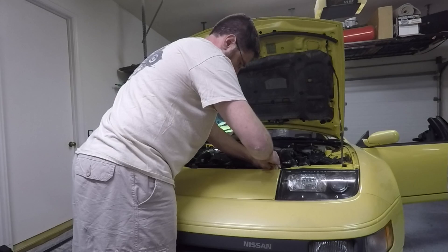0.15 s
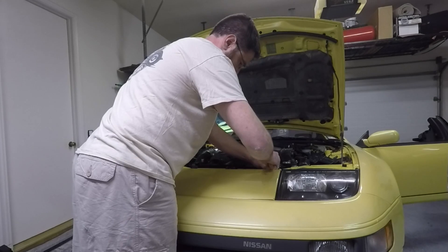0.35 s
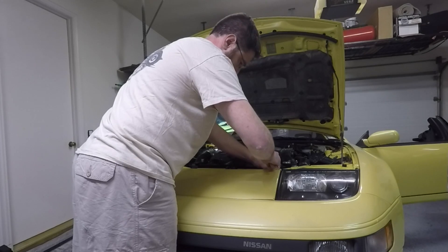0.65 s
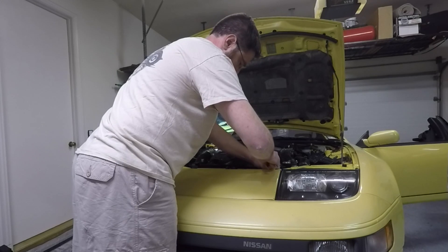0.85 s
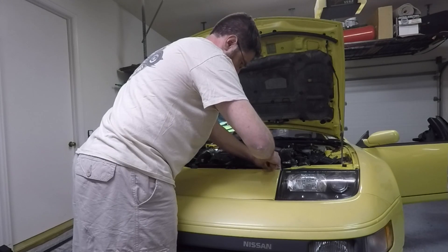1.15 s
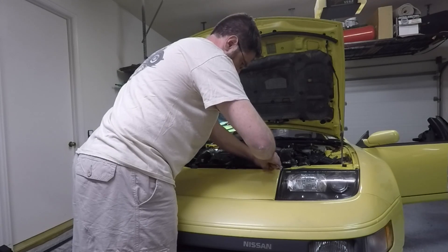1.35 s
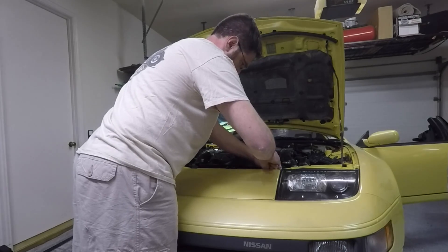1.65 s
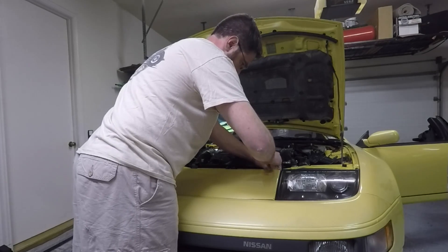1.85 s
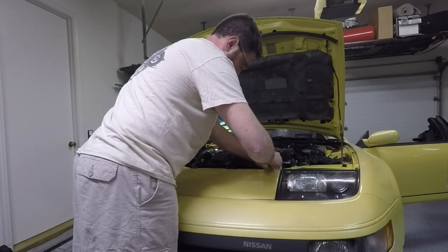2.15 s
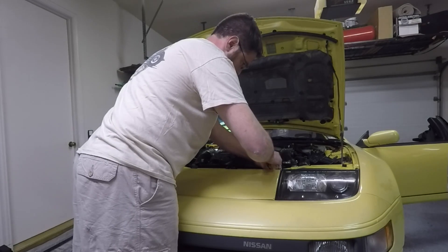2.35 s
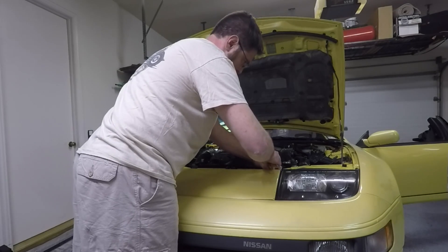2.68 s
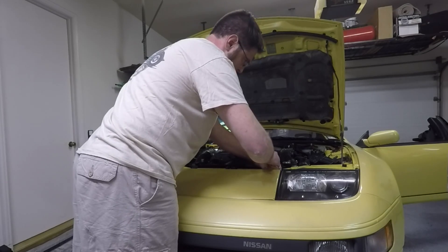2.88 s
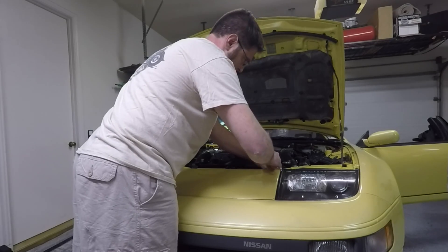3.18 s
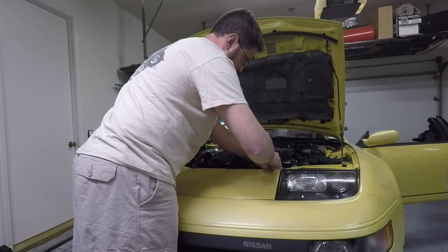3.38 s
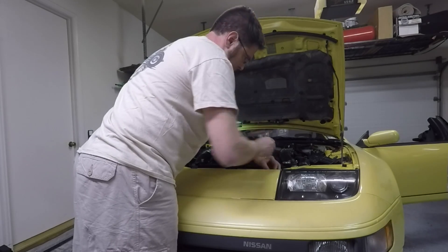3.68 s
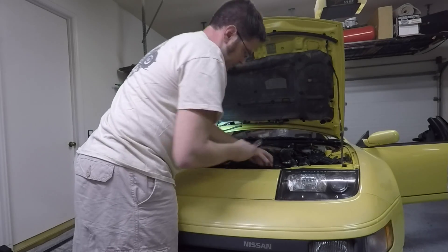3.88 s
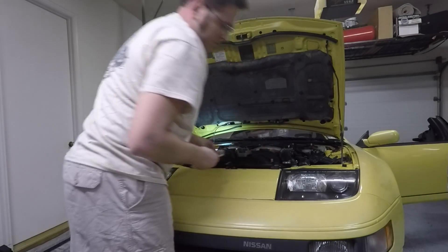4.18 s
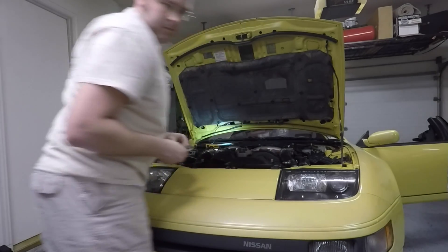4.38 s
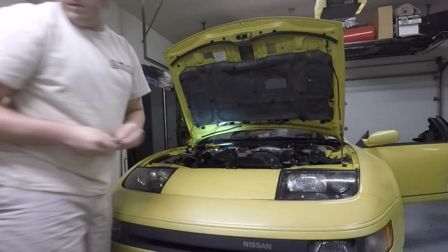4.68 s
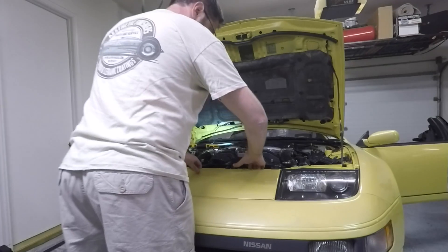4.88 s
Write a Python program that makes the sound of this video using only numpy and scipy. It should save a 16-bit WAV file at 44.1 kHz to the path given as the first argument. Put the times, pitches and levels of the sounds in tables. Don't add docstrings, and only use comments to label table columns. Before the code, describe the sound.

In a hushed concrete garage, someone touches steel car parts with small tools. Sparse dull taps and a little clip snap give way after three seconds to clanks, rapid clicks and a hard skidding slip. Movement rustle swells, loose parts tick, then thin bright scrapes end it after a brief level dip. Stereo, a couple of metres away, with faint room noise.

```python
import sys
import numpy as np
from scipy import signal
from scipy.fft import rfft, irfft
from scipy.io import wavfile
from scipy.ndimage import uniform_filter1d

SR = 44100
rng = np.random.default_rng(int(sys.argv[2]) if len(sys.argv) > 2 else 0)


def to_wav(sig):
    pcm = np.clip(np.atleast_2d(sig), -1, 1) * 32767
    pcm = np.round(pcm).astype(np.int16)
    wavfile.write(sys.argv[1], SR, pcm.T)


def invert_db(level):
    return 10 ** (np.asarray(level, dtype=float) / 20)


N = 221812
SIZE = 8192

# start_s, level_db (peak at 1.3-3 kHz),
# thud_db (panel, relative), ring_db (bright, relative: hard steel on steel rings higher)
SOCKET_KNOCKS = [(0.0766, -78, -6, -2), (0.191, -56, 2.5, -7), (0.284, -45, 8.5, 2), (0.406, -67, 1, -14),
                 (0.615, -71, -1, -12), (0.6985, -71, 3.5, -25), (0.9842, -55, -8.5, -4),
                 (1.525, -84, -4, -3), (2.0925, -57.5, 4, -17), (2.1096, -55, 4, -20),
                 (2.1789, -58.5, -5, -24), (2.442, -62.5, 8, -2), (2.567, -56.5, 4, -4),
                 (2.6917, -70.5, 12, -19), (2.827, -71, 1, -8), (2.942, -75.5, 16.5, -20),
                 (2.998, -51.5, 2.5, -19), (4.3934, -59, -17, -17), (4.4205, -58, -2, -11)]
CLIP_SNAPS = [
    (1.5775, -51.5, 7.2, 7.5),
    (1.6294, -62, 5.4, -16),
    (1.6681, -55.5, 1.7, -22),
    (1.7584, -63, 9.2, -22),
    (1.8049, -62.5, 10.4, -15),
    (1.9154, -76, 5.9, 1),
]
WRENCH_CLANKS = [
    (3.0254, -38.5, -25, -17),
    (3.0345, -36.5, -8, -33),
    (3.0449, -33, -46, -25.5),
    (3.0564, -45, 6.5, -30),
    (3.1804, -56, 5.5, -27),
]
RATCHET_CLICKS = [(3.5602, -32, -29, -9), (3.5692, -31.5, -21, -20), (3.5702, -27.5, -18, -21),
                  (3.588, -54, -29, -25), (3.6042, -51, -33, -20), (3.6142, -30.5, -24, -18),
                  (3.6244, -31.5, -32, -25), (3.6412, -40, -21, -23), (3.6594, -42, -26, -23),
                  (3.697, -41, -32, -5.5)]
NUT_TICKS = [(0.1735, -57, 4, -5), (2.5044, -61.5, 3.5, -17), (2.5194, -61.5, 10, 0), (3.2364, -54.5, 7, 0),
             (3.258, -38.5, -2, -2), (3.2844, -44, -26, -27), (4.3063, -44, -2.5, -19),
             (4.3264, -47, -2.5, -3), (4.3413, -41.5, -2, -2), (4.3574, -65, 7, -18)]
BOLT_SLIPS = [(3.7654, -54.5, -12, 10), (3.7874, -38.5, -18, 5), (3.7927, -40, -27, 10),
              (3.8062, -33.5, -6, 5), (3.8224, -23.5, -12, 2), (3.8262, -23, -9, -18),
              (3.8944, -37, -11, -0.5), (4.0194, -40.5, -6, -33), (4.0367, -40, -15, -33),
              (4.0794, -59, -2, -1)]
BRACKET_SCRAPES = [(4.2182, -42, -20, -22), (4.811, -50, -41, 11.5), (4.8197, -46.5, -20, 6),
                   (4.8274, -49, -18, 6.5), (4.8454, -53, -26, 10), (4.8726, -58.5, -14, 13),
                   (4.8818, -52, -16, -13), (4.9063, -54, -0.5, 8), (4.9338, -50, -5, -3)]

# (pitch_hz, level_db)
SOCKET = ([(583, 58, 4), (2140, 102, -9.5), (3620, 39, -12), (4350, 61, -19.5), (4800, 69, -39)],
           [(180, -37), (300, -15.5), (620, 2), (857, -1.5), (955, -9.5), (1470, -11.5), (1800, -39),
           (2200, -5), (3040, -51), (4400, -18), (6080, -29.5), (7210, -16), (8810, -48), (12000, -76),
           (15600, -77), (22000, -120)])
CLIP = ([(535, 117, 7), (1050, 28, -3), (2210, 67, -5), (3710, 110, -8)], [(180, -45), (300, -2.5),
         (583, -1), (769, -2), (1060, 6.5), (1800, -14), (2230, -2), (2520, -22), (3090, -30), (5060, -6.5),
         (5990, -14.5), (6570, -60), (7670, -27), (12000, -46), (15600, -76.5), (22000, -120)])
WRENCH = ([(1460, 37, -15), (2160, 19, 7), (2070, 86, 1), (2610, 65, -5.5), (2930, 23, -38)], [(180, -50),
           (300, -18), (437, -10), (869, -13.5), (1310, -11.5), (1440, 5.5), (1700, -13.5), (2320, -3.5),
           (2920, -43), (3610, -16), (6620, -36), (11500, -44), (15000, -78)])
PAWL = ([(1450, 48, -9), (2023, 28, 0), (2310, 44, 2.5), (2560, 120, -3), (5000, 43, 2)], [(180, -60),
         (300, -29), (334, -31), (539, -19), (940, -17.5), (1320, -17), (1430, -1), (1690, -18.5),
         (2600, -4), (3230, -15.5), (4980, -9.5), (12000, -30), (15600, -82), (22000, -120)])
NUT = ([(570, 21, -5.5), (1520, 32, 0.5), (2190, 140, -9), (4430, 97, -7.5)], [(180, -51), (300, -8),
        (430, -6.5), (928, -11.5), (1330, -7), (1470, -13), (1820, -17.5), (2170, -2.5), (2440, -15),
        (3220, -26), (5800, -17), (11000, -32.5), (12500, -38), (15000, -39)])
BOLT = ([(2165, 38, -8.5), (3350, 51, -10.5), (4950, 140, -13), (6670, 95, -14), (7060, 96, -12)],
         [(180, -58), (300, -31), (597, -16), (1310, -18.5), (1420, -17), (2040, -9.5), (2210, -4),
         (2600, -14), (3270, -16), (4540, -12), (4930, -13), (5620, -10.5), (7670, -10), (15000, -32.5)])
BRACKET = ([(1836, 62, 1), (5000, 50, -9), (6540, 43, -7), (7300, 59, 2), (9620, 120, -13)], [(180, -51),
            (300, -1), (1040, -17), (1620, -4.5), (1820, -3), (3610, -10.5), (4540, -2), (6840, -2),
            (7540, 7.5), (8600, -10), (9490, 4), (12700, -21), (15000, -14)])
CONTACT_EDGES_HZ = (300, 1300, 3000, 6000, 15000)

# start_s, level_db, pitch_hz, length_s
BODY_THUDS = [(3.056, -51.5, 437, 0.027), (3.299, -43.5, 515, 0.01), (3.31, -57, 229, 0.012),
              (3.824, -38.5, 487, 0.0069), (4.486, -55.5, 226, 0.022), (4.985, -42.5, 410, 0.034)]
# start_s, level_db, pitch_hz, length_s
SHORT_NOTES = [(.178, -56, 8200, 0.0043), (.284, -55, 4350, 0.013), (.984, -56.5, 3970, 0.0052),
               (2.503, -56.5, 5570, 0.0055), (2.505, -55, 6970, 0.0095), (2.505, -57, 8440, 0.0086),
               (3.028, -49, 6740, 0.011), (3.239, -46, 4100, 0.012), (3.242, -49.5, 8700, 0.015),
               (3.258, -38.5, 5950, 0.0023), (3.258, -45, 12640, .02), (3.29, -50.5, 4030, 0.035),
               (3.895, -36.5, 5350, 0.057), (3.90, -41.5, 3230, 0.041), (4.05, -45.5, 4220, .015),
               (3.70, -55, 5000, 0.0087), (4.08, -47, 4700, 0.018), (4.03, -42.5, 3250, 0.036),
               (4.152, -42, 1860, 0.014), (4.166, -40.5, 1880, 0.012), (4.305, -44.5, 4700, 0.028),
               (4.306, -49, 10400, 0.0044), (4.34, -50, 7450, .006), (4.357, -59, 7500, 0.0055),
               (4.357, -60, 11400, 0.0037), (4.36, -45.5, 2300, 0.005), (4.93, -56, 2210, 0.031)]
# time_s, left_minus_right_db
HAND_PAN = [(0.0, 1.8), (0.73, -1.5), (1.0, 2.2), (2.8, 0.6), (2.9, 2), (3.95, 0.9), (4.16, 8), (4.54, -.6),
            (4.75, 7), (5.03, 0.5)]

# time_s, effort_db, tilt_db (per range; rubbing on steel is bright, on cloth dull)
MOVEMENT = [(0.0, -75.5, -0.8), (0.35, -69, -2), (0.67, -79, -1.5), (1.2, -78.5, -1.1), (1.75, -73.5, -3),
            (1.899, -76.5, -1.1), (2.13, -74, -4.5), (2.35, -72, -3), (2.59, -72, -3), (3.15, -67, -2),
            (3.55, -65, -0.7), (3.72, -61, -1.1), (4.06, -57, 0.3), (4.25, -56, 2.9), (4.5, -58.5, -0.6),
            (4.62, -65.5, 3), (4.87, -70.5, 1), (5.03, -63.5, 1.7)]
RUSTLE_EDGES_HZ = (100, 400, 1300, 4000, 11500)
CLOTH_DB = (-3.5, 1.5, 1.5, -4.5)
SLIDE_DB = (-73, -55, -45.5, -47.5)
# peak_s, level_db
FOOTFALLS = [(0.3, -97), (1.4, -81.5), (3.05, -78), (3.84, -66.5), (4.45, -62), (4.68, -61.5), (4.93, -72)]

# pitch_hz, level_db
HUSH_SPECTRUM = [(15, -42), (25, -19.5), (135, 5), (286, -2.5), (438, 2), (952, -11.5), (1030, -12),
                 (1420, -3), (1720, -16), (2240, -12.5), (3090, -21.5), (8780, -17.5), (12100, -28),
                 (15000, -16.5)]
# pitch_hz, correlation
NOISE_LIKENESS = [(30, 0.75), (150, 0.51), (500, 0.79), (1500, 0.71), (4000, 0.022), (12000, 0.02)]
# pitch_hz, t60_s
GARAGE_T60 = [(200, 0.61), (600, 0.37), (2000, 0.17), (5000, 0.27), (12000, 0.14)]
# pitch_hz, correlation
ECHO_LIKENESS = [(300, 0.87), (1000, 0.97), (2500, 0.43), (5000, 0.011), (12000, 0.1)]
# time_s, level_db
LEVEL_DIP = [(0, 7), (4.76, -5), (4.80, -5.5), (4.813, -12.5), (4.833, 0.5), (5.1, 0)]


def contacts(events, part, weak_db, rise_s, grit_db, tick_db, damping, length_s, sizzle_db):
    ranges = [skirts(lo, hi) for lo, hi in zip(CONTACT_EDGES_HZ, CONTACT_EDGES_HZ[1:])]
    pitch_hz, width_hz, mode_db = np.transpose(part[0])
    strong = np.abs(resonances(pitch_hz, width_hz * damping)) ** 4
    weak = invert_db(on_log(np.fft.rfftfreq(SIZE, 1 / SR), part[1]) + weak_db) ** 2
    out = np.zeros(N + SIZE)
    for start_s, level_db, thud_db, ring_db in events:
        strike_db = mode_db - 3.0 * rng.standard_normal(len(pitch_hz))
        body = causal(np.sqrt(weak + invert_db(strike_db) ** 2 @ strong))
        slow = chatter(length_s * 1.2, rise_s * 1.2, grit_db, tick_db)
        quick = chatter(length_s * 0.7, rise_s * 0.7, grit_db, tick_db)
        forces = (slow, slow, quick, quick)
        relative_db = (thud_db, 0, ring_db, ring_db + sizzle_db)
        for span, rel_db, force in zip(ranges, relative_db, forces):
            add(out, start_s, force * body * span, level_db + rel_db)
    return out[:N]


def notes(events, width_share, grit_db, tick_db):
    out = np.zeros(N + SIZE)
    for start_s, level_db, pitch_hz, length_s in events:
        force = chatter(length_s, 0.00093, grit_db, tick_db)
        mode = resonances(pitch_hz, width_share * pitch_hz)[0] ** 2
        add(out, start_s, force * mode, level_db)
    return out[:N]


def chatter(length_s, rise_s, grit_db, tick_db):
    t = np.arange(SIZE) / SR
    grit = rng.standard_normal(SIZE) * invert_db(np.minimum(grit_db * rng.exponential(size=SIZE), 15))
    force = grit * (1 - np.exp(-t / rise_s)) * np.exp(-(t / max(length_s, 0.001)) ** 1.54)
    force[8] = invert_db(tick_db) * np.sqrt(np.sum(force ** 2))
    return rfft(force)


def resonances(pitch_hz, width_hz):
    offset_hz = np.fft.rfftfreq(SIZE, 1 / SR) - np.reshape(pitch_hz, (-1, 1))
    return 1 / (1 + 2j * offset_hz / np.reshape(width_hz, (-1, 1)))


def skirts(lo_hz, hi_hz):
    b, a = signal.butter(2, [lo_hz / 1.15, hi_hz * 1.1], "bandpass", fs=SR)
    return signal.freqz(b, a, SIZE // 2 + 1, include_nyquist=True)[1]


def causal(gain):
    cepstrum = irfft(np.log(gain))
    cepstrum[1:SIZE // 2] *= 2
    cepstrum[SIZE // 2 + 1:] = 0
    return np.exp(rfft(cepstrum))


def add(out, start_s, spectrum, level_db):
    sound = irfft(spectrum)
    crest = np.sqrt(2 * uniform_filter1d(sound ** 2, size=128).max())
    out[int(start_s * SR):][:SIZE] += sound * invert_db(level_db) / crest


def garage(x):
    wet_db, side_db, onset_s = 0.1, 3, 0.004
    t = np.arange(SR // 2) / SR
    tail = 0
    for hz in 150 * 2. ** np.arange(7):
        fade = np.exp(-np.log(1000) * t / on_log(hz, GARAGE_T60)) * (1 - np.exp(-t / onset_s))
        part = band(rng.standard_normal((2, len(t))), hz / np.sqrt(2), hz * np.sqrt(2)) * fade
        like = np.clip(on_log(hz, ECHO_LIKENESS), 0, 0.99)
        part *= np.sqrt(hz / np.sum(part[0] ** 2)) * np.sqrt([[1 + like], [(1 - like) * invert_db(side_db)]])
        mid, side = part
        tail = tail + np.array([mid + side, mid - side])
    tail *= invert_db(wet_db) / np.sqrt(np.sum(tail[0] ** 2))
    tail[:, 0] = 1
    return signal.fftconvolve(x[None], tail, axes=1)[:, :N]


def rustle():
    flicker_db, grain_db, trim_db = 2.5, 2.0, -3
    time_s, effort_db, tilt_db = np.transpose(MOVEMENT)
    out = 0
    for k, (lo, hi) in enumerate(zip(RUSTLE_EDGES_HZ, RUSTLE_EDGES_HZ[1:])):
        noise = wide_noise(np.ones_like) * invert_db(grain_db * rng.exponential(size=N))
        rub_db = effort_db + CLOTH_DB[k] + tilt_db * (k - 3 / 2)
        rub = invert_db(np.interp(np.arange(N) / SR, time_s, rub_db))
        skid = swell(3.915, SLIDE_DB[k], rise_s=0.16, fall_s=0.051)
        out = out + unit(band(noise, lo, hi)) * np.hypot(rub, skid) * invert_db(flicker_db * walk(25) + trim_db)
    return out


def hush():
    hiss_db, shake_db, shake_share, foot_fade_s = -72.5, -77, 0.88, 0.12
    hiss = wide_noise(lambda hz: invert_db(on_log(hz, HUSH_SPECTRUM))) * invert_db(hiss_db + 0.5 * walk(1.7))
    rumble = unit(band(wide_noise(np.ones_like), 26, 165))
    time_s, effort_db, _ = np.transpose(MOVEMENT)
    effort = np.interp(np.arange(N) / SR, time_s, effort_db - effort_db.mean())
    shake = invert_db(shake_db + shake_share * effort)
    steps = sum(swell(start_s, level_db, foot_fade_s, foot_fade_s) for start_s, level_db in FOOTFALLS)
    return hiss + rumble * (shake + steps)


def wide_noise(gain):
    hz = np.fft.rfftfreq(N, 1 / SR)
    like = np.clip(on_log(hz, NOISE_LIKENESS), 0, 1)
    mid, side = rfft(rng.standard_normal((2, N))) * gain(hz) * np.sqrt([1 + like, 1 - like])
    return unit(irfft(np.array([mid + side, mid - side]), N))


def swell(peak_s, level_db, rise_s, fall_s):
    late_s = np.arange(N) / SR - peak_s
    return invert_db(level_db - 20 * np.maximum(-late_s / rise_s, late_s / fall_s))


def walk(rate_hz):
    k = int(SR / rate_hz)
    return uniform_filter1d(np.repeat(rng.standard_normal(N // k + 1), k), k)[:N]


def band(x, lo_hz, hi_hz):
    return signal.sosfilt(signal.butter(2, [lo_hz, hi_hz], "bandpass", fs=SR, output="sos"), x)


def unit(x):
    return x / np.sqrt(np.mean(x ** 2))


def on_log(hz, table):
    pitch_hz, value = np.array(table)[:, 0], np.array(table)[:, 1]
    return np.interp(np.log(hz + 1), np.log(pitch_hz), value)


def scene():
    tools = contacts(SOCKET_KNOCKS, SOCKET, weak_db=2.0, rise_s=0.0028, grit_db=5.0, tick_db=-6.5,
                     damping=3.5, length_s=0.015, sizzle_db=-8.5)
    tools += contacts(CLIP_SNAPS, CLIP, weak_db=0.5, rise_s=0.0015, grit_db=1.5, tick_db=-13.0,
                      damping=2.8, length_s=0.015, sizzle_db=-23)
    tools += contacts(WRENCH_CLANKS, WRENCH, weak_db=4.5, rise_s=0.0014, grit_db=10.5, tick_db=-5.5,
                      damping=2.4, length_s=0.017, sizzle_db=13)
    tools += contacts(RATCHET_CLICKS, PAWL, weak_db=1.5, rise_s=0.0007, grit_db=4.0, tick_db=-2,
                      damping=2.2, length_s=0.0053, sizzle_db=-30)
    tools += contacts(NUT_TICKS, NUT, weak_db=5.5, rise_s=0.0028, grit_db=12.5, tick_db=-17.5,
                      damping=1.35, length_s=0.01, sizzle_db=3.0)
    tools += contacts(BOLT_SLIPS, BOLT, weak_db=-3.0, rise_s=0.0014, grit_db=8.5, tick_db=-9,
                      damping=4.0, length_s=0.02, sizzle_db=3.5)
    tools += contacts(BRACKET_SCRAPES, BRACKET, weak_db=-2.5, rise_s=0.0035, grit_db=8, tick_db=-2.5,
                      damping=2.6, length_s=0.02, sizzle_db=0.0)
    tools += notes(BODY_THUDS, width_share=0.29, grit_db=0.0, tick_db=8.0)
    tools += notes(SHORT_NOTES, width_share=0.16, grit_db=4, tick_db=-9)
    pan_db = np.interp(np.arange(N) / SR, *np.transpose(HAND_PAN))
    panned = garage(tools * invert_db(-3.5)) * invert_db(np.array([pan_db, -pan_db]) / 2)
    return panned + rustle() + hush()


def top_cut(x):
    return signal.sosfilt(signal.butter(12, 15610, fs=SR, output="sos"), x)


def record(dry):
    low_pass = signal.ellip(8, 0.2, 60, 15120, fs=SR, output="sos")
    limited = signal.sosfilt(low_pass, dry)
    dip_db = np.interp(np.arange(N) / SR, *np.transpose(LEVEL_DIP))
    return top_cut(limited * invert_db(dip_db))


dry = scene()
out = record(dry)
to_wav(out)
```